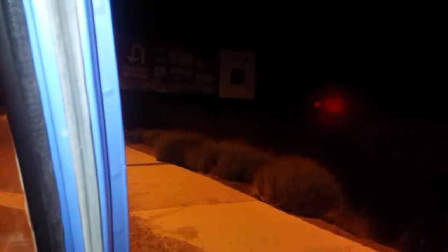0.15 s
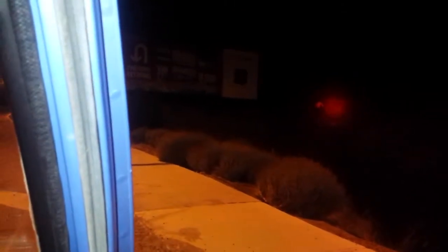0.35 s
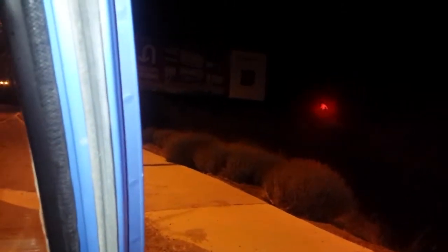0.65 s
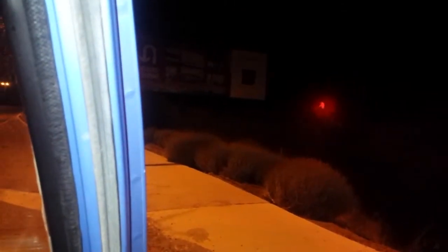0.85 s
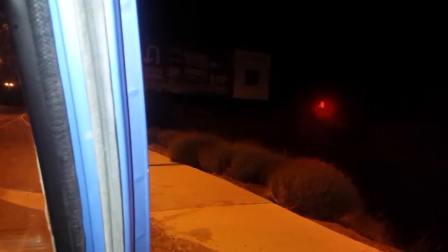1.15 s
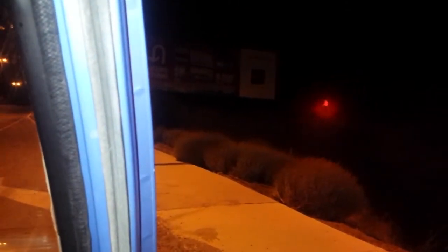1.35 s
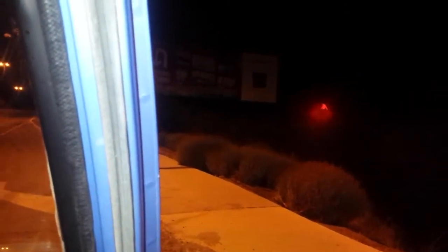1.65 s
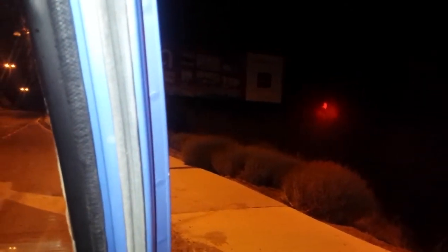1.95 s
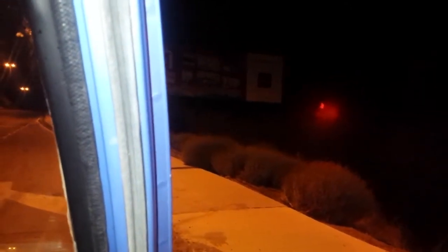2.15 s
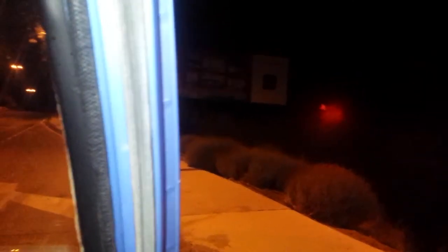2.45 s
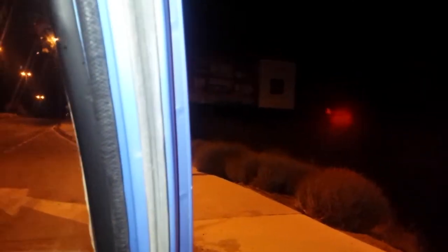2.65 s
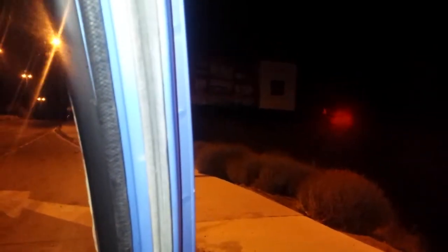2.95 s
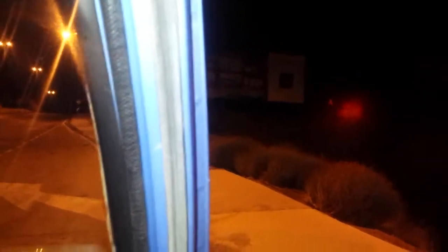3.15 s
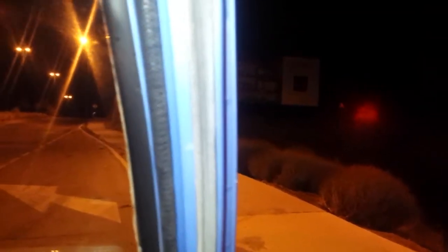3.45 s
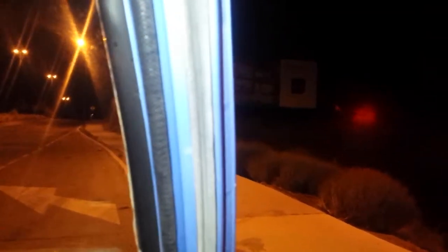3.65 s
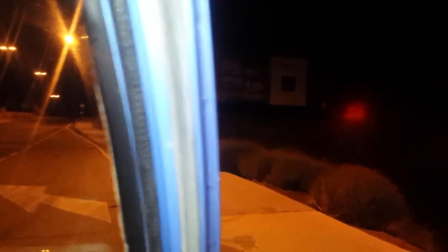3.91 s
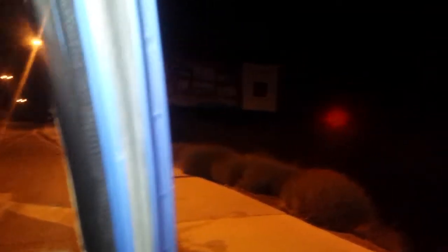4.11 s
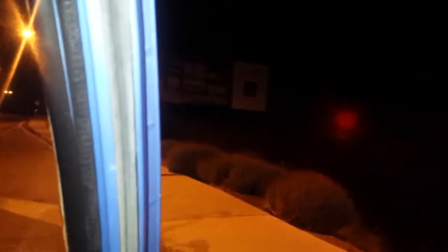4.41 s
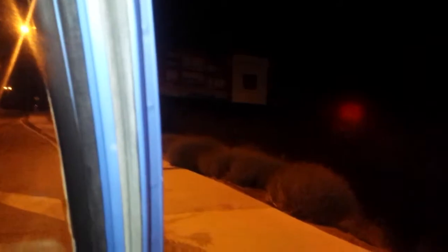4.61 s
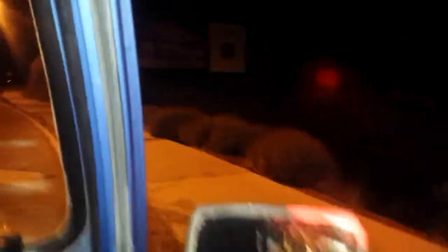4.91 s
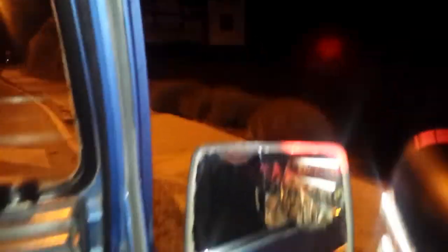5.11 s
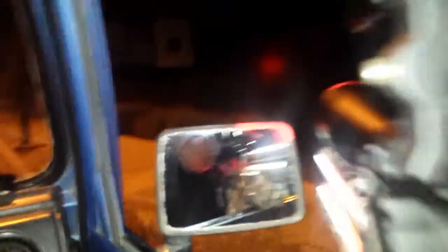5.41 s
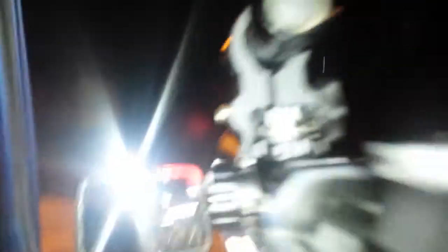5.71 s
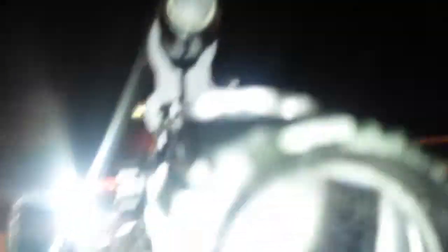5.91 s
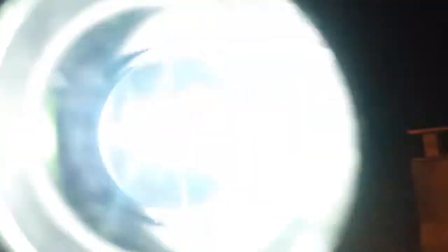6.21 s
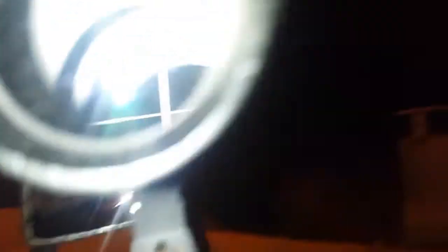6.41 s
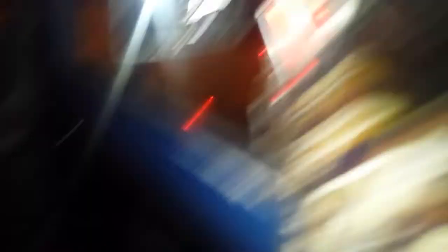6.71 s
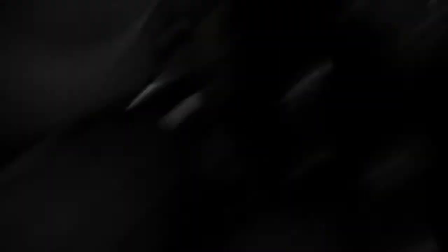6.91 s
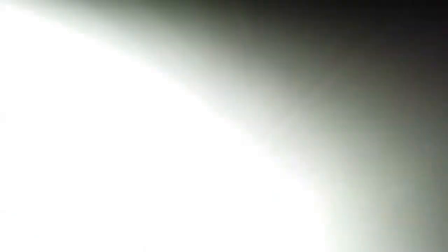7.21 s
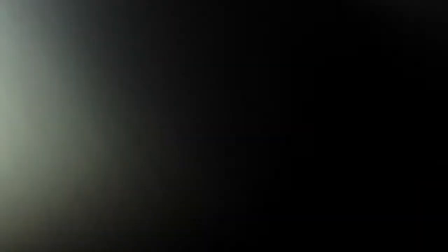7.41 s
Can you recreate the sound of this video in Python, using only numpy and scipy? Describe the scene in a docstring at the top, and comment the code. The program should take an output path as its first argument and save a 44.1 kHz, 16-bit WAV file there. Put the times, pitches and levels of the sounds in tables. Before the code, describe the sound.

Steady indicator tick-tock in a standing vehicle, with sleeve rustle and soft bumps, ending in close handling and three sharp knocks.

```python
"""Inside a standing vehicle at night, heard from a hand-held phone. From the start a flasher relay
ticks and tocks at a fixed rate, its armature ringing the dashboard. Outside, a faint engine hum climbs
for four seconds, then holds. Someone shifts in the cabin with sleeve rustle and soft bumps, heaviest
midway. After six seconds a hand closes round the phone, right at the microphones: rubbing, three sharp
knocks on the case, the hardest with a low body on the left, then one dull finger thump on the right."""
import sys
import numpy as np
from scipy import signal
from scipy.fft import rfft, irfft
from scipy.io import wavfile

SR = 44100
rng = np.random.default_rng(int(sys.argv[2]) if len(sys.argv) > 2 else 0)


def dump(signal):
    """Clip the signal to [-1, 1] and save it as 16-bit WAV at the path in sys.argv[1]."""
    limited = np.clip(np.atleast_2d(signal).T, -1, 1)
    pcm = np.round(limited * 32767).astype(np.int16)
    wavfile.write(sys.argv[1], SR, pcm)


N = 333345
TIME = np.arange(N) / SR

# Still air all round the microphones. Each row: frequency in Hz, relative level in dB.
AIR_SPECTRUM = [(30, -2), (70, 3), (140, -5.5), (250, -25), (500, -17), (900, -6), (1400, -24), (2500, -21),
                (6400, -14), (14500, -15)]
# The engine outside, heard from the cabin. Each row: time in seconds, level in dB.
HUM_LEVELS = [(0, -75.5), (.9, -67.5), (1.17, -63), (1.4, -72), (1.95, -79), (2.3, -67.5), (3.0, -71),
              (3.44, -65.5), (3.5, -60), (3.77, -58.5), (3.86, -72.5), (4.22, -51), (4.4, -57), (4.58, -57),
              (4.7, -74), (7.5, -76)]
WHINE_LEVELS = [(0, -97), (1.45, -76), (1.9, -85.5), (2.3, -76), (2.85, -79), (3.1, -97.5), (7.5, -91)]
# Bumps in the cabin. Each row: start in seconds, thud level in dB, thud pitch in Hz,
# scuff level in dB, time to fall 60 dB in seconds.
SEAT_BUMPS = [(.575, -56.5, 117, -75, 0.58), (.63, -57, 153, -67, .16), (.856, -53.5, 158, -69, 0.16),
              (1.675, -58, 150, -60.5, 0.23), (3.384, -62, 412, -55.5, 0.19), (3.725, -65, 337, -66, .23),
              (3.793, -58, 420, -72, 0.1), (4.05, -52.5, 197, -63, 0.23), (4.185, -61, 160, -54, 0.2),
              (4.43, -57, 183, -57.5, 0.11), (4.505, -40.5, 183, -50.5, 0.27),
              (4.536, -36.5, 123, -63, 0.35), (4.587, -40.5, 129, -60, 0.25), (4.77, -55, 285, -79, .3),
              (5.567, -48, 178, -61, 0.21), (5.57, -47, 425, -69, 0.14)]
# Cloth and fingers close by. Each row: start in seconds, level in dB, time to fall 60 dB in seconds,
# left minus right in dB.
CLOTH_SNAGS = [(0.073, -54, 0.12, 2), (0.18, -56, 0.013, 7), (0.259, -52, 0.0074, 9),
               (1.278, -52.5, 0.087, 2), (3.931, -52, 0.082, 2), (4.185, -44.5, 0.044, 2),
               (4.432, -47, 0.064, 2), (5.464, -48, 0.054, 3), (5.809, -52, 0.023, 3),
               (7.0339, -30, 0.01, 5), (7.328, -33, 0.012, 1), (7.333, -32.5, 0.015, -8.5),
               (7.339, -46, 0.18, -1)]
# Hollow notes of sliding cloth or skin. Each row: start and length in seconds, first and last pitch
# in Hz, quality factor, level in dB.
HOLLOW_RUBS = [(4.2, .17, 1590, 1500, 9, -67.5), (4.19, .13, 4980, 4900, 14, -66.5),
               (4.743, .27, 334, 323, 6, -60), (5.3, .57, 1400, 1400, 5.8, -69),
               (6.2, .9, 2480, 2450, 6, -63), (6.8, .34, 1424, 1320, 9, -58),
               (6.862, .17, 970, 880, 9, -57), (7.065, .14, 880, 770, 10, -62)]
# The three colours of friction at the phone. Each row: frequency in Hz, relative level in dB.
RUMBLE_SPECTRUM = [(20, -11.5), (70, -2), (140, 0.5), (220, -1.5), (400, -12), (700, -18), (2000, -63)]
RUB_SPECTRUM = [(200, -11.5), (420, 1.5), (620, -1), (850, 0), (1100, -3), (1400, -2), (1950, -7.5),
                (2500, -8.5), (3500, -9.5), (8000, -41)]
HISS_SPECTRUM = [(1500, -11), (2600, -7.5), (3700, -4.5), (5000, 0), (6400, 1.5), (8000, -1.5),
                 (10000, -6.5), (14000, -13.5)]
# Cloth is never quite still. The three values: rumble, rub and hiss in relative dB.
RESTING_CLOTH_DB = (-72.5, -77, -79)
# A sleeve near the phone. Each row: start and time until it lets go in seconds, then rumble, rub
# and hiss in relative dB.
SLEEVE_BRUSHES = [(.03, 0.24, -68.5, -69, -73), (0.489, 0.16, -56.5, -67, -67),
                  (.97, 0.67, -67.5, -72.5, -66.5), (2.27, 0.51, -76, -77.5, -79.5),
                  (3.3, 0.52, -68, -78.5, -74.5), (3.9, 0.24, -63, -68.5, -69.5),
                  (4.12, 0.47, -60, -63.5, -63.5), (4.62, 0.47, -63.5, -75, -69.5),
                  (5.12, 0.4, -66, -65.5, -63), (5.5, .48, -60.5, -67, -65.5)]
# The hand on the phone itself. Each row: time in seconds, then rumble, rub and hiss in relative dB.
HAND_GRIP = [(6.12, -66, -75, -82), (6.25, -63, -67, -58), (6.67, -57, -58, -50), (6.87, -56.5, -49.5, -49),
             (7.04, -58, -52.5, -50.5), (7.1, -63, -61, -61.5), (7.27, -62, -64, -61.5),
             (7.35, -63, -76, -57.5), (7.56, -98, -95, -48.5)]
# The low body of the hardest knock, then a dull finger thump. Each row: time and width in seconds,
# level before the bass cut in dB, left minus right in dB.
LOW_PULSES = [(7.0603, 0.00045, -29, 16), (7.335, 0.00092, -19.5, -15.5)]
# Taps on the case. Each row: start in seconds, level of the first 2 ms before the bass cut in dB,
# left minus right in dB.
CASE_KNOCKS = [(7.0328, -25, 3), (7.0599, -15.3, 12), (7.1983, -20.5, 14)]
# The ring of the case. Each row: frequency in Hz, time to fall 60 dB in seconds, then relative level
# in dB in the first, second and third knock.
CASE_RING = [(750, .003, -24, -23, -42), (1400, .004, -24, -36, -10), (2350, .0055, -22, -10, -30),
             (3600, .003, -16, -8, -3), (4900, .0025, -2, -18, -6), (6400, .0025, 0, 0, 0),
             (8200, .002, -8, 2, -6), (12500, .0013, -20, -3, -8)]
# The ring of relay and panel, then their dense reflections round the cabin.
# Each row: frequency in Hz, relative level in dB on closing and on opening.
RELAY_RING = [(212, -16, -16), (277, -18, -19), (358, -12, -10), (405, -18, -17), (478, -14, -10),
              (550, -20, -14), (1300, -17, -12), (1405, -15, -14), (1660, -14, -15), (1740, -14, -14),
              (1830, -13, -14), (2320, -20, -15), (2720, -14, -17), (2810, -11, -20), (2925, -5, -13),
              (3030, -9, -14), (3090, -10, -14), (3300, -24, -14), (3690, -13, -20), (3838, -4, -18),
              (3980, -11, -18), (4450, -6, -12), (4530, 0, -9), (4590, -4, -12), (5420, -13, -10),
              (5840, -5, -17), (6445, -7, -11), (6550, -8, -4), (6740, -11, -6), (8880, -8, -22)]
CABIN_REFLECTIONS = [(150, -17, -15), (447, -14.5, -3), (730, -16.5, -7), (1060, -21.5, -20.5),
                     (1290, -14, -11), (2320, -14, -9), (2860, -5.5, -12), (4280, -4.5, -11.5),
                     (5270, -4.5, -7), (7400, -6, -1), (7630, -7, -9), (8570, -2, -8),
                     (10270, -13.5, -14.5), (14600, -14.5, -19)]
# The phone's body shades its right port from the relay. Each row: frequency in Hz, left minus right in dB.
PORT_SHADE = [(500, 0), (2500, 3), (4300, 7), (6600, 8), (7800, 1.5), (9500, -3), (14000, -1.5)]
# The moving phone's aim at the dashboard. Each row: time in seconds, gain in dB, left minus right in dB.
MIC_AIM = [(0, -3.5, -3.5), (.8, 1, -0.5), (2.1, -2, -0.5), (4.6, 4, -2), (5.05, 0, -2.5), (5.5, 2.5, -1.5),
           (6.15, -1.5, -0.5), (6.83, 7.5, -3.5), (7.15, -8.5, 5), (7.56, -7.5, 0)]


def undb(db):
    return 10 ** (np.asarray(db) / 20)


def unit(x):
    """Scale to rms 1."""
    return x / np.sqrt(np.mean(x ** 2))


def pan(db):
    """Left and right gains for a level difference between the microphones."""
    return undb(np.array([[1], [-1]]) * db / 2)


def curves(table):
    """The columns of a table, joined by straight lines in time."""
    times, *columns = np.transpose(table)
    return [np.interp(TIME, times, column) for column in columns]


def shape(x, gain):
    """Filter by a gain given as a function of frequency."""
    size = x.shape[-1]
    hz = np.maximum(np.arange(size // 2 + 1) * SR / size, 1)
    return irfft(rfft(x) * gain(hz), size)


def colour(x, points):
    """Filter by a curve of (Hz, dB) points."""
    hz, db = np.transpose(points)
    return shape(x, lambda f: undb(np.interp(np.log(f), np.log(hz), db)))


def band(x, hz, q):
    """A resonance with steep skirts, rms 1."""
    return unit(shape(x, lambda f: 1 / (1 + (q * (f / hz - hz / f)) ** 2)))


def passband(x, side, hz, order):
    """Keep the "low" or the "high" side of a frequency."""
    return signal.sosfilt(signal.butter(order, hz, side, fs=SR, output="sos"), x + 1e-18)


def noise(size, apart):
    """Stereo noise; apart is the side against the mid."""
    mid, side = rng.standard_normal((2, size))
    return unit(np.array([mid + apart * side, mid - apart * side]))


def wander(rate_hz):
    """A random curve with a spread near 1."""
    steps = rng.standard_normal(4096)
    return np.interp(TIME * rate_hz, np.arange(len(steps)), steps)


def swell(t, rise, t60):
    """An envelope that builds up and dies away, top 1."""
    env = (1 - np.exp(-(t / rise) ** 2)) * np.exp(-np.log(1000) * t / t60)
    return env / env.max()


def add(out, start, x):
    """Mix a sound in at a time in seconds."""
    i = int(start * SR)
    out[:, i:i + x.shape[1]] += x[:, :N - i]


def cabin_air(db=-73):
    """The even hush of the cabin, stronger in the right microphone."""
    return undb(db) * unit(colour(noise(N, apart=0.94), AIR_SPECTRUM)) * pan(-5.0)


def engine(start_hz=103, climb_hz_per_s=8.35, top_hz=138.4, whine_order=2.28, waver=0.0033):
    """From outside, a wavering firing tone comes through the body shell, with a weak whine above."""
    hz = np.minimum(start_hz + climb_hz_per_s * TIME, top_hz)
    (hum_db,), (whine_db,) = curves(HUM_LEVELS), curves(WHINE_LEVELS)
    phase = 2 * np.pi * np.cumsum(hz * (1 + waver * wander(25))) / SR
    hum = undb(hum_db + 1.3 * wander(5.9)) * unit(np.sin(phase))
    whine = undb(whine_db + 2 * wander(10)) * unit(np.sin(whine_order * phase))
    return hum + whine


def seat_bumps(rise_s=0.0032, scuff_hz=780):
    """Near the centre, each shift of weight gives a dull thud and a scuff of upholstery."""
    out, t = np.zeros((2, N)), TIME[:16384]
    for start, thud_db, thud_hz, scuff_db, t60 in SEAT_BUMPS:
        env = swell(t, rise_s, t60)
        thud = unit(band(noise(len(t), apart=0.11), thud_hz, q=1.66) * env)
        scuff = unit(band(noise(len(t), apart=0.65), scuff_hz, q=0.95) * env)
        add(out, start, (undb(thud_db) * thud + undb(scuff_db) * scuff) * np.sqrt(np.mean(env ** 2)))
    return out * pan(0.93)


def cloth_snags(rise_s=0.0015):
    """Cloth and skin snag close to the microphones in brief bright clicks."""
    out, t = np.zeros((2, N)), TIME[:8192]
    for start, db, t60, lr_db in CLOTH_SNAGS:
        hiss = unit(colour(noise(len(t), apart=0.94), HISS_SPECTRUM))
        add(out, start, undb(db) * pan(lr_db) * hiss * swell(t, rise_s, t60))
    return out


def hollow_rubs(lr_db=3):
    """A little to the left, friction drives narrow resonances of seat or cupped hand; most sink in pitch."""
    out = np.zeros((2, N))
    for start, length, start_hz, end_hz, q, db in HOLLOW_RUBS:
        size = int(length * SR)
        resonance = band(noise(SR, apart=0.67), start_hz, q)
        position = np.cumsum(np.linspace(1, end_hz / start_hz, size))
        glide = np.array([np.interp(position, np.arange(SR), x) for x in resonance])
        add(out, start, undb(db) * glide * signal.windows.tukey(size, .5))
    return out * pan(lr_db)


def sliding_db(attack_s=0.09, release_s=0.12):
    """Levels of rumble, rub and hiss: each brush builds up, holds and lets go; then the hand takes over."""
    gripping = TIME > HAND_GRIP[0][0]
    power = undb(RESTING_CLOTH_DB)[:, None] ** 2 + undb(curves(HAND_GRIP)) ** 2 * gripping
    for start, length, *db in SLEEVE_BRUSHES:
        attack = np.clip((TIME - start) / attack_s, 0, 1)
        release = np.clip(1 - (TIME - start - length) / release_s, 0, 1)
        power += (undb(db)[:, None] * attack * release) ** 2
    return 10 * np.log10(power)


def handling(trim_db=(-1, 1, 1), grain_db=1.5):
    """Cloth and skin slide at the phone: a rumble through the case, an uneven rub and a grainy hiss."""
    rumble_db, rub_db, hiss_db = sliding_db() + np.array(trim_db)[:, None]
    # the contact catches and lets go; its slip moves rub and hiss together
    slip_db, catch_db, jolt_db = .9 * wander(45), 1.5 * wander(30), 2.5 * wander(16)
    rumble = undb(rumble_db + jolt_db) * unit(colour(noise(N, apart=0.31), RUMBLE_SPECTRUM))
    rub = undb(rub_db + slip_db + catch_db) * unit(colour(noise(N, apart=0.8), RUB_SPECTRUM))
    grains = noise(N, apart=1.0) * undb(grain_db * wander(500))
    hiss = undb(hiss_db + slip_db) * unit(colour(grains, HISS_SPECTRUM))
    return rumble * pan(0.66) + rub * pan(1.1) + hiss * pan(2.1)


def low_thumps(bass_cut_hz=105):
    """Two pressure pulses: the hardest knock's low body on the left, a dull finger thump on the right."""
    pressure = sum(undb(db) * pan(lr_db) * np.exp(-((TIME - centre) / width) ** 2)
                   for centre, width, db, lr_db in LOW_PULSES)
    return passband(pressure, "high", bass_cut_hz, order=2)


def case_knocks(port_lag_s=.00016):
    """Hard taps ring the phone case for a few milliseconds, right beside the left microphone port."""
    out = np.zeros((2, N))
    t = np.maximum(TIME[:1024] - np.array([[0], [port_lag_s]]), 0)
    for k, (start, db, lr_db) in enumerate(CASE_KNOCKS):
        # each mode takes most of a cycle to get going
        ring = sum(undb(mode_db[k]) * np.sin(2 * np.pi * hz * t) * swell(t, .8 / hz, t60)
                   for hz, t60, *mode_db in CASE_RING)
        add(out, start, undb(db) * pan(lr_db) * ring / ring[:, :SR // 500].std())
    # so small a case radiates no bass
    return passband(out, "high", hz=800, order=2)


def armature_stroke(closing, phases, paths, ring_t60=0.072, panel_cycles=60, echo_t60=0.084,
                    rise_s=0.0041, port_lag_s=0.00029):
    """One blow of the armature: modes build up through the dashboard, among dense cabin reflections."""
    modes, t = np.array(RELAY_RING), TIME[:paths.shape[1]]
    column = 1 if closing else 2
    # the contacts never land quite alike: pitch, strength of each mode and build-up vary a little
    hz = modes[:, :1] * (1 + .003 * rng.standard_normal((len(modes), 1)))
    gains = undb(modes[:, column] + 2 * rng.standard_normal(len(modes)))
    rise = rise_s * np.exp(.12 * rng.standard_normal())
    # the low panel modes linger longest
    t60s = np.maximum(ring_t60, panel_cycles / modes[:, 0])
    envelopes = np.array([gain * swell(t, rise, t60) for gain, t60 in zip(gains, t60s)])
    # the sound reaches the left port first
    ring = np.array([np.sum(envelopes * np.sin(2 * np.pi * hz * (t - lag) + phase), axis=0)
                     for lag, phase in zip((0, port_lag_s), phases)])
    echoes = colour(paths, np.array(CABIN_REFLECTIONS)[:, [0, column]]) * swell(t, rise, echo_t60)
    ports = unit(ring) + unit(echoes)
    return np.array([colour(x, np.array(PORT_SHADE) * [1, side]) for x, side in zip(ports, (.5, -.5))])


def flasher_relay(first_opening_s=.0928, period_s=.70905, open_s=.3579, lead_s=.003, drift=0.2,
                  click_db=(-40, -36.5), body_db=(-50.5, -53.5), body_aim_share=0.76):
    """Behind the dashboard the armature drops and pulls in by turns, each stroke with its own echoes."""
    out = np.zeros((2, N))
    hz = np.array(RELAY_RING)[:, :1]
    phases = rng.uniform(0, 2 * np.pi, (2, 1, len(hz), 1))
    # short waves reach the two ports out of step
    phases = phases + 0.5 * np.minimum(hz / 1500, 2) * rng.standard_normal((2, 2, len(hz), 1))
    paths = [noise(8192, apart=0.86) for _ in range(2)]
    aim_db, lr_db = curves(MIC_AIM)
    for opening in np.arange(first_opening_s, N / SR, period_s):
        for closing, start in enumerate((opening, opening + open_s)):
            i = min(int(start * SR), N - 1)
            db = aim_db[i] - 0.4 * rng.standard_normal()
            # the paths through the cabin change a little as the phone moves
            phases[closing] += drift * rng.standard_normal(phases[closing].shape)
            paths[closing] = unit(paths[closing] + drift * noise(8192, apart=0.68))
            stroke = armature_stroke(closing, phases[closing], paths[closing])
            body, click = (passband(stroke, side, hz=2000, order=4) for side in ("low", "high"))
            body, click = (x / x[:, :SR // 70].std() for x in (body, click))
            click *= undb(db + click_db[closing]) * pan(lr_db[i])
            # the dashboard's low body depends less on the phone's aim than the click does
            body *= undb(body_aim_share * db + body_db[closing])
            add(out, start - lead_s, click + body)
    return out


def scene():
    """Everything that reaches the phone's two microphones."""
    return (flasher_relay() + engine() + seat_bumps() + cloth_snags() + hollow_rubs()
            + case_knocks() + low_thumps() + handling() + cabin_air())


def record(dry):
    """The phone clips the hardest knocks and cuts the top above 14.7 kHz."""
    top_cut = signal.ellip(10, .2, 80, 14700, fs=SR, output="sos")
    return signal.sosfilt(top_cut, np.clip(dry, -.85, .85))


dry = scene()
out = record(dry)
dump(out)
```